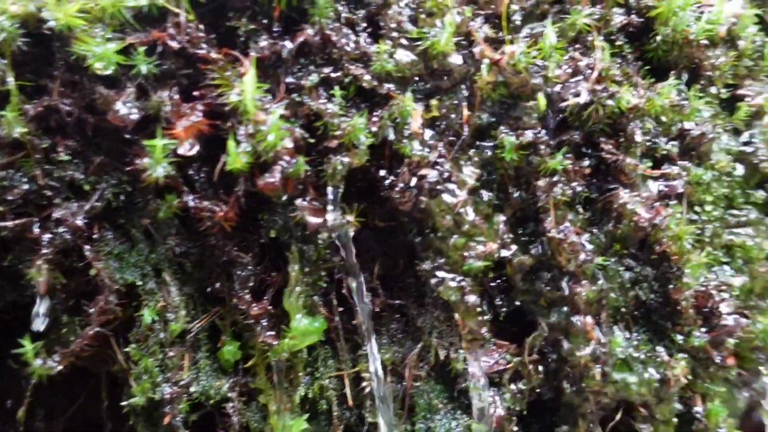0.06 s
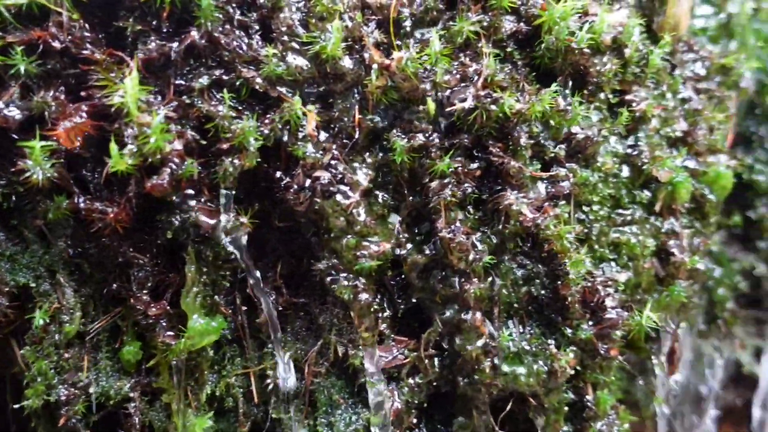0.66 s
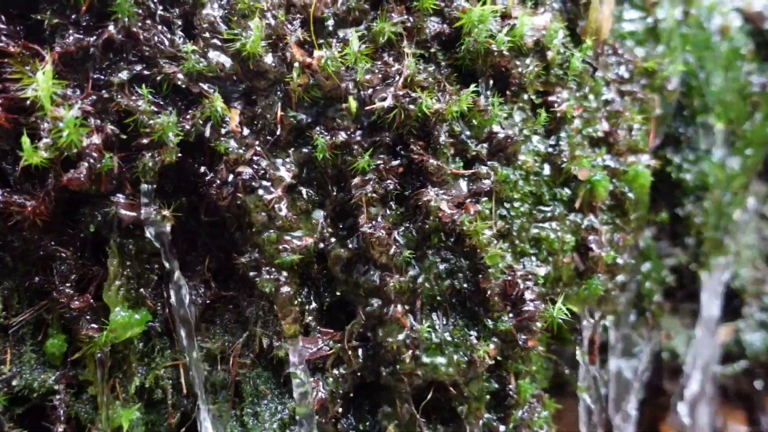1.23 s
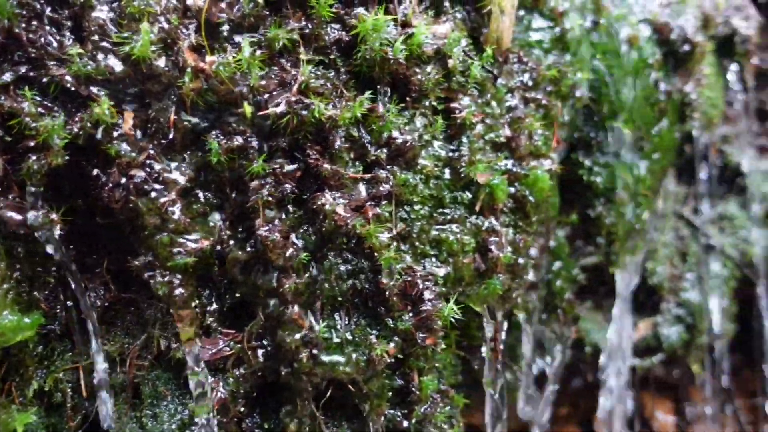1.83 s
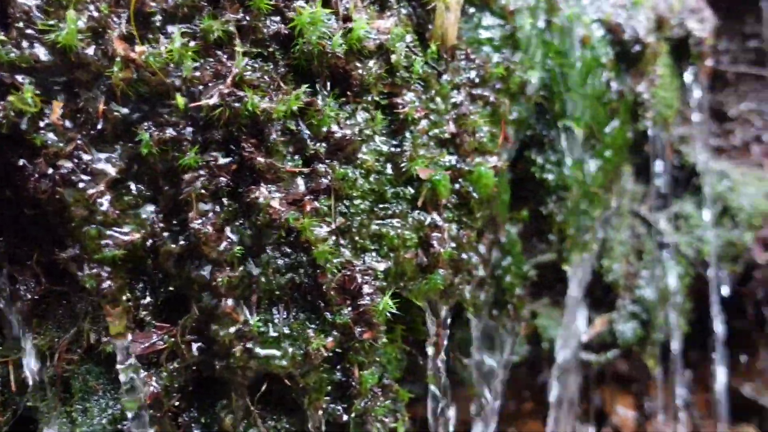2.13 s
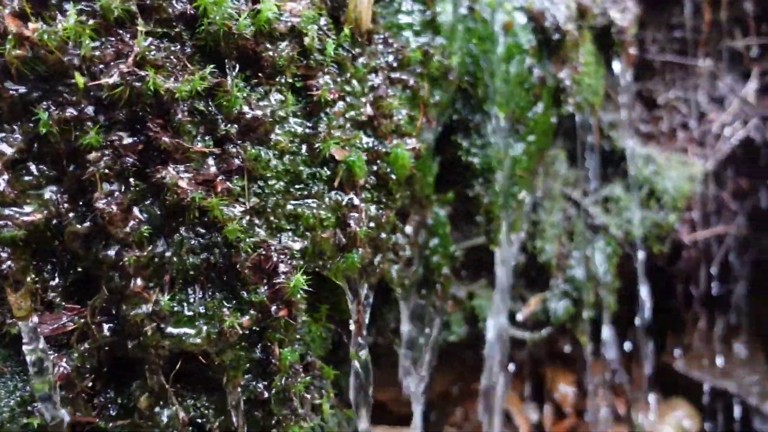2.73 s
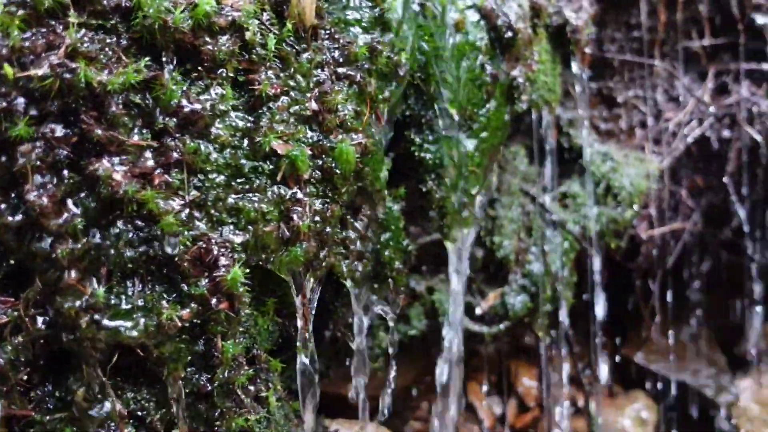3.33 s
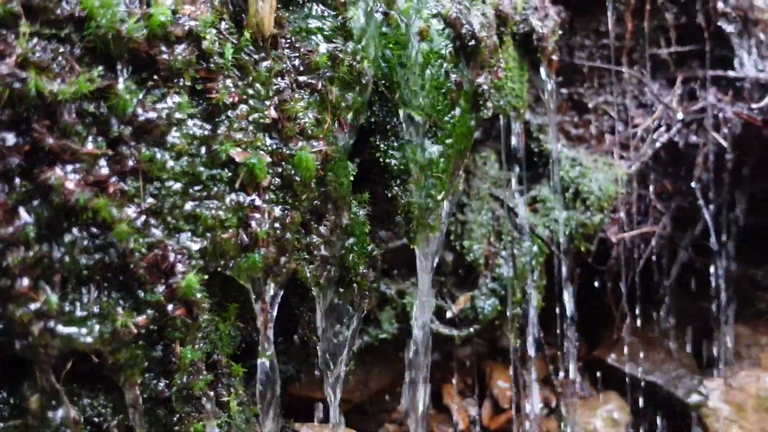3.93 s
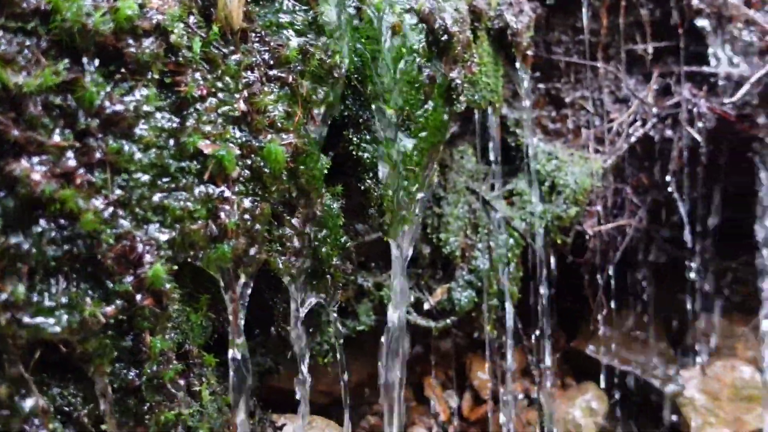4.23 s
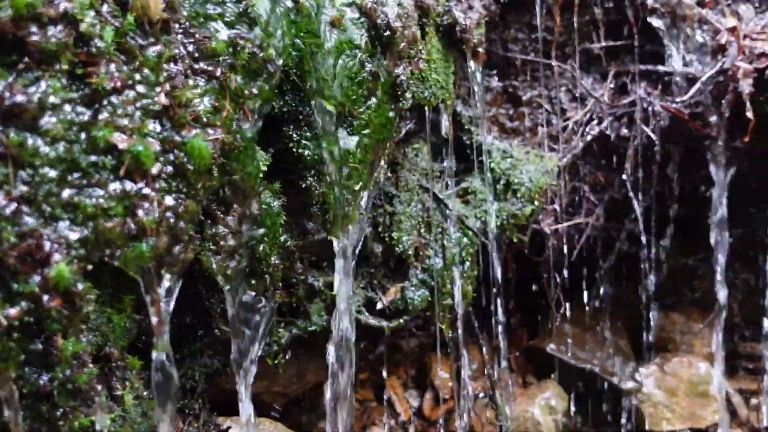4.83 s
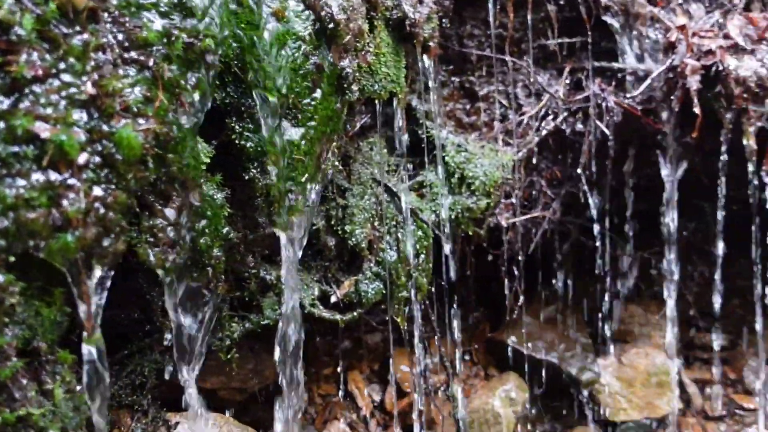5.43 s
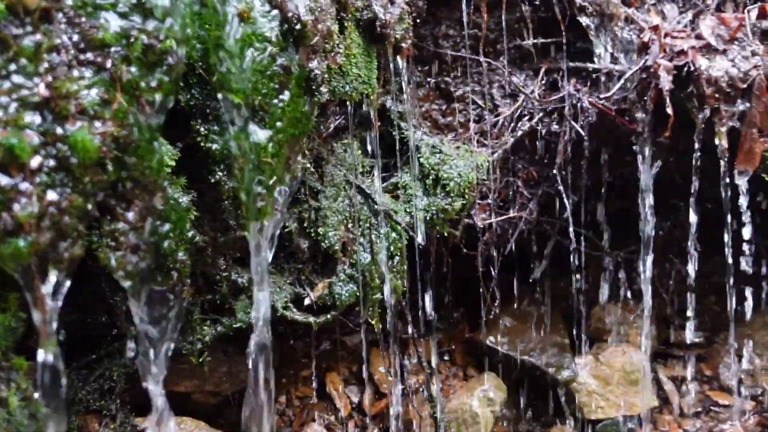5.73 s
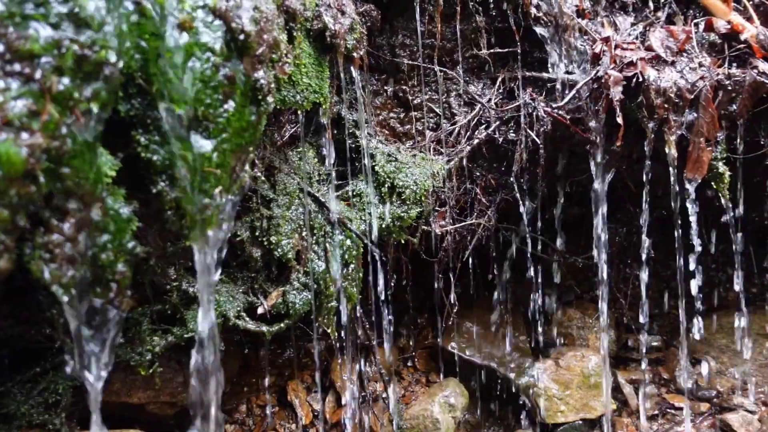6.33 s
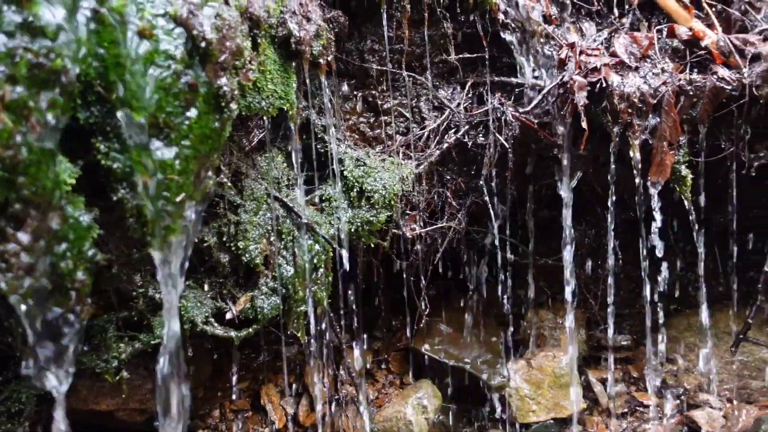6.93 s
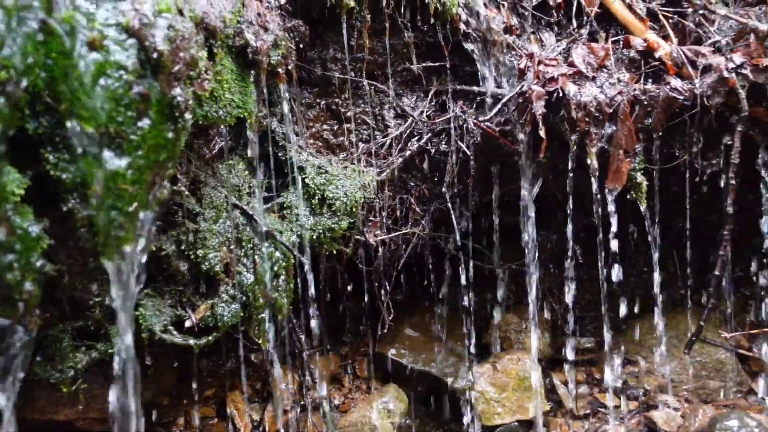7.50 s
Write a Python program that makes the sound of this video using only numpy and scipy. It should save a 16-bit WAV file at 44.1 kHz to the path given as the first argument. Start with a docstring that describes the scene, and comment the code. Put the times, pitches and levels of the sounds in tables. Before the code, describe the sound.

Thin streams of water fall off a mossy overhang and splash onto wet rock and shallow puddles close by. Quick bubbly plips, crisp splats and a light gurgle run throughout, over a fine hiss of spray and the soft wash of farther streams. The hollow under the ledge colours the splashing slightly. As the microphone slowly turns, the water moves from a little right towards the centre and gets slightly brighter.

```python
"""From the start, thin streams fall off a mossy overhang onto wet rock and shallow puddles close by.
Each splash rings short-lived air bubbles and throws fine spray, coloured and scattered by the hollow
under the ledge; farther streams merge into a wash. An air pocket bloops shut just after 1 s and again
at 4.5 s, and three heavy drops thud faintly between about 4.5 and 5.5 s. By the end the microphone
has slowly turned towards the water, which is now a little brighter and nearer the centre."""
import sys
import numpy as np
from scipy import signal
from scipy.fft import rfft, irfft, next_fast_len
from scipy.io import wavfile
from scipy.ndimage import uniform_filter1d, map_coordinates

SR = 44100
rng = np.random.default_rng(int(sys.argv[2]) if len(sys.argv) > 2 else 0)


def unload_wav(signal):
    """Save mono or channel-first audio to the path in sys.argv[1] as 16-bit WAV at rate SR, clipped to [-1, 1]."""
    wavfile.write(
        sys.argv[1],
        SR,
        np.round(np.clip(np.atleast_2d(signal).T, -1, 1) * 32767).astype(np.int16),
    )


N = 333396

# The loudest bubbles in the nearest puddles. Each row: start in seconds, pitch in Hz, level in dB,
# decay in seconds.
LOUD_PLIPS = [(.026, 700, -25, 0.003), (.055, 3060, -8.5, 0.0016), (.228, 1310, -11.5, .0048),
              (.248, 1950, -12, .0028), (.283, 3570, -9, .0022), (.367, 1180, -9.5, 0.0011),
              (.382, 690, -17, .0023), (.391, 2740, -8.5, 0.0019), (.463, 1870, -11.5, .0018),
              (.501, 875, -18, 0.0054), (.586, 1000, -18, .0021), (.622, 890, -15, .0036),
              (.643, 507, -25, 0.0056), (.673, 5060, -8.5, .001), (.814, 500, -22, .0035),
              (.954, 2970, -12, .0014), (.981, 910, -12.5, .003), (1.031, 860, -22, 0.0046),
              (1.077, 4356, -12, .0015), (1.146, 1060, -12, 0.0012), (1.1513, 1270, -11, 0.0026),
              (1.188, 2600, -14, .002), (1.261, 2670, -15, .0015), (1.264, 4100, -9.5, .002),
              (1.316, 3755, -10, .001), (1.387, 2700, -12, .002), (1.397, 643, -22, .0034),
              (1.409, 3150, -7, .0012), (1.439, 1590, -17, .002), (1.476, 680, -22, 0.0029),
              (1.51, 2630, -11, .0027), (1.586, 1480, -10.5, .0034), (1.604, 1500, -13, 0.0022),
              (1.632, 1850, -13, .0023), (1.634, 932, -19, .0035), (1.66, 870, -20, 0.0042),
              (1.716, 2260, -15, .0021), (1.75, 3560, -8.5, .0013), (1.829, 3040, -9, 0.0022),
              (1.854, 3120, -5, .0014), (1.868, 2015, -16, .002), (1.944, 2075, -15.5, .0035),
              (1.989, 1720, -12.5, .004), (1.991, 4490, -9, .0009), (2.007, 1520, -11, 0.002),
              (2.023, 1870, -9, 0.0011), (2.127, 790, -23, 0.0069), (2.138, 3790, -5, .0009),
              (2.267, 745, -19, 0.0035), (2.316, 2554, -12, .0018), (2.327, 2150, -6.5, .0015),
              (2.343, 500, -23, .004), (2.348, 1630, -11, .0018), (2.35, 860, -19, 0.0041),
              (2.37, 860, -20, 0.0057), (2.451, 2670, -7.5, 0.0019), (2.459, 1737, -10, .0012),
              (2.57, 2540, -6.5, .002), (2.585, 736, -15.5, 0.0099), (2.598, 2480, -13, .0016),
              (2.62, 5360, -12, .0013), (2.681, 970, -15, .0028), (2.706, 6600, -11, .0011),
              (2.77, 880, -18.5, .0037), (2.814, 3350, -11.5, .0014), (2.838, 2600, -16, 0.0018),
              (2.857, 2760, -6, .001), (2.884, 1670, -11.5, 0.0024), (2.961, 3740, -10.5, .0014),
              (2.992, 3420, -11.5, 0.0025), (3.026, 4120, -5.5, 0.00073), (3.07, 714, -23, .0035),
              (3.081, 4070, -8, .001), (3.106, 960, -15, .003), (3.134, 940, -17.5, 0.0044),
              (3.171, 940, -14.5, .0025), (3.221, 625, -23, .004), (3.314, 2550, -8.5, 0.0013),
              (3.334, 1737, -15, .0016), (3.352, 5200, -13, .0014), (3.394, 1217, -18, .0022),
              (3.41, 1460, -13, .0022), (3.428, 2620, -12, .002), (3.519, 3620, -10, .0009),
              (3.533, 5650, -15, .0018), (3.556, 3200, -9, 0.0012), (3.633, 1780, -12.5, .0022),
              (3.685, 960, -16, 0.0047), (3.686, 4960, -9, .0011), (3.724, 1217, -14.5, .0037),
              (3.755, 693, -23.5, .0034), (3.765, 4150, -10.5, .0021), (3.782, 1500, -14, .0024),
              (3.806, 1560, -13, .0024), (3.819, 2160, -9.5, 0.0016), (3.828, 4410, -10, .001),
              (3.892, 2410, -11.5, .004), (3.899, 1570, -15.5, 0.0079), (3.906, 2670, -11, .002),
              (3.91, 663, -22, 0.0036), (3.933, 2480, -11, .002), (3.949, 4490, -11, .0012),
              (3.96, 7000, -14, .0011), (3.994, 3140, -7.5, 0.0017), (4.045, 1520, -14, .0025),
              (4.058, 3870, -15, .0012), (4.079, 4140, -9, .001), (4.09, 1050, -13.5, 0.0065),
              (4.123, 4420, -10, .001), (4.161, 920, -19, 0.0036), (4.176, 4380, -9.5, .0015),
              (4.178, 1500, -16, .002), (4.212, 950, -17.5, 0.0061), (4.324, 2710, -13, .0013),
              (4.395, 770, -18, .003), (4.456, 970, -16, .0025), (4.486, 2710, -12, .0016),
              (4.5, 1500, -15, .0019), (4.505, 4620, -12, .0017), (4.616, 795, -19, 0.003),
              (4.636, 854, -21, .003), (4.655, 1940, -12.5, .0018), (4.706, 2030, -14, .0022),
              (4.74, 5000, -10, .001), (4.803, 1270, -16, .0045), (4.823, 700, -16, 0.0031),
              (4.897, 804, -24, .005), (4.9, 1254, -13, .002), (4.942, 960, -17, .0035),
              (4.951, 3700, -8, 0.0015), (4.993, 2790, -12, .0014), (5.065, 4800, -14, .0013),
              (5.113, 2150, -12, .002), (5.121, 1330, -11.5, 0.0034), (5.211, 1480, -8.5, .00095),
              (5.232, 1580, -4, 0.0015), (5.232, 730, -21, .004), (5.262, 2554, -16, .002),
              (5.285, 1950, -8, .0015), (5.292, 4680, -10, .0009), (5.32, 2230, -15, 0.0019),
              (5.387, 1843, -11, .0015), (5.399, 2337, -12, .0021), (5.435, 2340, -9, .001),
              (5.45, 1760, -15, 0.0023), (5.467, 855, -22, 0.01), (5.476, 3320, -12.5, .002),
              (5.496, 1540, -13, 0.0035), (5.496, 3200, -13, .002), (5.555, 2680, -9, .0014),
              (5.742, 1590, -14, .003), (5.789, 4780, -13, .0014), (5.815, 2770, -10.5, .0015),
              (5.829, 1843, -12, .002), (5.835, 2750, -15, .003), (5.877, 5690, -12, .0009),
              (5.891, 700, -23, 0.0036), (5.915, 3050, -11, .0015), (5.925, 1290, -20, .003),
              (5.972, 828, -19.5, .003), (5.975, 2500, -13, .002), (5.997, 4050, -13, .0014),
              (6.006, 2270, -12, .002), (6.092, 1490, -7.5, 0.00084), (6.103, 1590, -12, .0018),
              (6.107, 910, -23, 0.0024), (6.237, 1720, -12, .0022), (6.293, 1680, -13, .0022),
              (6.368, 4356, -14, .0018), (6.373, 1290, -18, 0.0026), (6.387, 1254, -19, .002),
              (6.409, 940, -11.5, .003), (6.428, 804, -17, .0037), (6.477, 3500, -13, .0018),
              (6.487, 2050, -13, .0055), (6.626, 2554, -17, .0018), (6.628, 4730, -13, .0013),
              (6.647, 4450, -13, .0011), (6.692, 3450, -7.5, .0013), (6.697, 1980, -16, .0022),
              (6.698, 878, -17, .0033), (6.726, 1843, -17, .0025), (6.747, 3170, -14, .0018),
              (6.808, 6800, -15, .0014), (6.82, 1570, -11.5, 0.0057), (6.851, 5000, -12, 0.0013),
              (6.874, 3870, -13, .0009), (6.893, 905, -19, .003), (6.915, 3050, -14, 0.0025),
              (6.943, 2650, -12, 0.0035), (6.945, 640, -22, .0035), (6.955, 510, -25, .004),
              (6.984, 970, -8, 0.0021), (7.008, 2690, -10.5, .0032), (7.024, 3240, -14, .003),
              (7.025, 1630, -14, 0.002), (7.077, 615, -23, 0.0026), (7.09, 3985, -11.5, .002),
              (7.1, 1620, -8.5, 0.0018), (7.101, 660, -24, .0035), (7.116, 2350, -7, .0012),
              (7.125, 1290, -14, .0024), (7.215, 2450, -11, .002), (7.216, 1700, -15, .0025),
              (7.224, 6560, -10, .001), (7.273, 4750, -12, .0014), (7.289, 4900, -11, .0013),
              (7.323, 6035, -15, .0016), (7.324, 3755, -12, .0013), (7.34, 1500, -9.5, .003),
              (7.455, 1550, -8.5, 0.0016), (7.466, 853, -20.5, 0.004), (7.476, 1750, -13, .0024),
              (7.515, 1630, -15, .003), (7.517, 2390, -10, .0014), (7.545, 1540, -9, 0.0024)]
# The lesser plips, biggest bubble first. Each row: pitch in Hz, top level in dB.
LESSER_PLIPS = [(780, -20), (1400, -19), (2300, -21.5), (3200, -17.5), (4600, -17), (6800, -23)]
# Air pockets pinching shut. Each row: centre in seconds, pitch there in Hz, level in dB,
# swell in seconds, glide in octaves a second.
AIR_POCKETS = [(1.149, 1006, -18.5, .0065, 38), (4.524, 992, -14.5, .0042, 18)]
# Blobs bursting on rock. Each row: centre in seconds, pitch in Hz, top level in dB, length in seconds.
ROCK_SPLATS = [(.084, 3500, -12, 0.027), (.552, 3100, -10.5, 0.02), (.795, 4200, -12, 0.023),
               (1.53, 4270, -8, 0.024), (1.676, 3180, -10.5, 0.018), (2.078, 3080, -13.5, 0.015),
               (2.233, 4060, -9.5, 0.017), (2.335, 2250, -21, 0.02), (2.622, 4400, -13, 0.03),
               (3.004, 5000, -12, .01), (3.2, 2800, -13, 0.034), (3.322, 2660, -16, 0.032),
               (4.325, 3570, -15, 0.032), (4.455, 2700, -15, .028), (4.74, 4200, -14, 0.038),
               (5.027, 2620, -14, 0.032), (5.205, 3450, -17, 0.019), (5.268, 3050, -18, 0.026),
               (5.319, 3400, -13, 0.013), (5.624, 2900, -17, .03), (6.185, 5000, -11, .03),
               (6.813, 2700, -13, 0.033), (6.942, 2200, -18, .02), (7.216, 2540, -18, 0.027),
               (7.549, 4100, -8.5, 0.025)]
# The hardest drops on bare stone. Each row: start in seconds, level in dB.
HARD_SMACKS = [(.7955, -10), (1.0799, -5), (1.102, -2), (1.3166, -11), (1.5385, -7), (1.609, -8),
               (2.4783, 1), (2.5648, -7), (2.8485, -10), (3.266, -4), (3.4802, -6), (3.5197, -4),
               (4.235, -6), (4.4355, -9), (4.6222, -11), (4.9976, -3), (5.1835, -8), (5.274, -6),
               (5.9107, -13), (6.3083, -8), (6.3425, -7), (6.5492, -6), (6.7792, -13), (7.1696, -12)]
# Heavy drops on soft ground. Each row: start in seconds, level in dB.
GROUND_THUDS = [(4.472, -63), (5.229, -64), (5.505, -68)]
# The flow of the thick stream into its pool. Each row: time in seconds, level in dB.
PLUNGE_FLOW = [(0, -35.5), (1.4, -34.5), (2.2, -34.5), (3.2, -34.5), (4.1, -37), (4.7, -33), (5.3, -34),
               (5.8, -38), (6.5, -37), (7.56, -35.5)]
# Air resonances under the ledge. Each row: centre in Hz, width in Hz, boost or cut in dB.
HOLLOW_RESONANCES = [(532, 136, 4), (634, 49, -1), (724, 51, 2.5), (769, 50, -2.5), (926, 110, 5),
                     (1093, 210, -6), (1418, 32, -11.5), (1657, 68, -4.5)]

# The tone of each layer. Each row: frequency in Hz, relative level in dB.
WATER_EQ = [(71, -94), (120, -55), (312, -26), (519, -11.5), (636, -13), (719, -9.5), (936, -9),
            (1100, 0.5), (1560, -0.5), (4220, -1), (9910, -7.5), (13400, -15.5), (15500, -43)]  # the splashing as a whole
PUDDLE_EQ = [(200, -1.5), (800, 0.5), (1400, -2), (4000, -2.5), (7000, -3.5), (15000, -1)]  # shallow puddles, on top of WATER_EQ
POOL_EQ = [(150, -55), (400, -12.5), (650, -4.5), (925, -0.5), (1300, -7.5), (2200, -5), (6000, -46)]  # the plunge pool, on top of WATER_EQ
WASH_EQ = [(150, -0.5), (500, 1), (930, 2.5), (1500, 3.5), (4000, 0.5), (8000, 0), (14000, -4.5)]  # far streams, on top of WATER_EQ
SMACK_EQ = [(100, -58), (400, -20), (1200, -5), (3000, -2), (5500, 10.5), (8500, -7), (11000, -9),
            (13500, -7), (15500, -11)]  # drops cracking on stone
SPRAY_EQ = [(100, -67), (400, -35), (1200, -25), (3000, 4), (5000, -2), (8000, -2.5), (11000, -5),
            (15500, -20)]  # ticking droplets
MIST_EQ = [(100, -80), (1500, -29), (4000, 10), (7000, -0.5), (10000, -2), (13000, 0.5), (15500, -8)]  # the finest spray
SHEEN_EQ = [(2000, -56), (7000, 3.5), (11000, 0.5), (13500, 0), (15500, -2.5)]  # far spray on moss and leaves
FOREST_EQ = [(20, -2), (70, -7), (160, 3), (400, -12), (2000, -50)]  # still forest air

# Moss screens the water until the microphone has turned. Each row: time in seconds, treble gain in dB.
MOSS_SCREEN = [(0, -3), (1.2, -1.6), (1.8, -1.2), (2.5, -0.5), (4, 0), (5.6, 1.4), (6.5, 1), (7.56, 0.2)]
# Low sound bends round the moss. Each row: frequency in Hz, share of the screening that applies.
SCREEN_SHARE = [(400, 0), (900, 0.59), (2000, 0.39), (5000, 0.62), (13000, 0.89)]
# Where the water lies. Each row: time in seconds, left over right in dB.
WATER_PAN = [(0.0, -5), (1.22, -3.5), (7.56, -1.0)]
# The microphone's sense of direction. Each row: frequency in Hz, share of the pan it picks up.
PAN_SHARE = [(200, 0.4), (700, 0.16), (1300, 0.92), (4400, 1), (8000, 1.04), (13000, -0.29)]
# Diffuse sound at its two ports. Each row: frequency in Hz, left-right correlation.
PORT_LIKENESS = [(60, .85), (140, 0.73), (300, 0.75), (640, 0.96), (1400, 0.96), (3100, 0.96), (7000, 0.79),
                 (10000, 0.74), (13000, 1)]
# The phase between the ports. Each row: frequency in Hz, lead of the left in radians.
PORT_PHASE = [(20, 0), (5600, 0.2), (9700, 0.82), (12700, 0.5), (15300, 0)]

PUDDLE_DB, SPRAY_DB, WASH_DB, SHEEN_DB, FOREST_DB = -27, -27.5, -24, -35.5, -85  # faders of the beds
BAND_LIMIT_HZ = 15700


def near_bubbles(count=330, big_decay_s=0.0042, small_bias=0.633, spread_db=2):
    """The loudest plips over a drip of lesser ones; small bubbles ring higher and die sooner."""
    when, pitch, weakness, ring = rng.random((count, 4)).T
    low_hz, high_hz = LESSER_PLIPS[0][0], LESSER_PLIPS[-1][0]
    hz = low_hz * (high_hz / low_hz) ** (pitch ** small_bias)  # a bias under 1 favours high pitches
    decay_s = big_decay_s * (hz / low_hz) ** -0.57 * 2 ** (ring - .5)
    db = along(LESSER_PLIPS, hz) - spread_db * weakness
    return plips(*np.transpose(LOUD_PLIPS)) + plips(drip_times(when), hz, db, decay_s)


def plips(start, hz, db, decay_s, samples=2200, shudder=.58, splash_db=-8.5, splash_decay_s=0.0037):
    """Each blob rings a bubble that shudders as the water breaks, with a splash and two fainter bubbles."""
    pan_db = rng.normal(0, 0.88, len(start))
    jolts = uniform_filter1d(rng.standard_normal((len(start), samples)), size=12, axis=1)
    stray = shudder * np.cumsum(jolts, axis=1) / np.sqrt(decay_s * SR)[:, None]
    ring = bubble_ring(hz, decay_s, rise=0.025, swell=0.38, samples=samples, stray=stray)
    rings = placed(start, amp(db - 2.0)[:, None] * ring, pan_db)
    for delay, ratio in rng.random((2, 2, len(start))):
        wake_hz = np.minimum(hz * (0.87 + 0.73 * ratio), 9000)
        wake = bubble_ring(wake_hz, 0.41 * decay_s, rise=0.04, swell=0.33, samples=1100)
        rings += placed(start + 0.000996 + 0.0045 * delay, amp(db - 9.5)[:, None] * wake, pan_db)
    t = np.arange(SR // 40) / SR
    bursts = rng.standard_normal((len(start), len(t))) * np.exp(-t / splash_decay_s)
    splashes = placed(start, amp(db + splash_db)[:, None] * bursts, pan_db)
    splashes = coloured(splashes, lambda f: hollow_water_db(f) + along(PUDDLE_EQ, f))
    return coloured(rings, lambda f: low_cut_db(f, corner_hz=685)) + splashes


def bubble_ring(hz, decay_s, rise, swell, samples, stray=0):
    """One row per bubble: it swells, dies away and rises in pitch as it nears the surface."""
    t = np.arange(samples) / SR
    age = t / decay_s[:, None]
    envelope = np.exp(-age) * (1 - np.exp(-age / swell))
    phase = 2 * np.pi * hz[:, None] * t * (1 + rise * np.minimum(age, 10) / 2)
    return envelope / envelope.max(1, keepdims=True) * np.sin(phase + stray)


def splats(droplets=17, spread_db=8.5, spread_octaves=1.19):
    """A blob bursts on the rock and its droplets land in a quick, crisp cluster."""
    centre, pitch, db, length = np.repeat(ROCK_SPLATS, droplets, axis=0).T
    when, smallness, weakness, side = rng.random((len(centre), 4)).T
    hz = pitch * 2 ** (spread_octaves * (smallness - .5))
    gain = amp(db - spread_db * weakness)
    ticks = gain[:, None] * bubble_ring(hz, 1.74 / hz, rise=0.02, swell=0.17, samples=360)
    clusters = placed(centre + length * (when - .5), ticks, pan_db=6 * (side - .5))
    return coloured(clusters, lambda f: low_cut_db(f, corner_hz=990))


def smacks(count=180, light_db=-18, spread_db=7, decay_s=0.0004):
    """Hard drops crack on bare stone; lighter ones fall at random between them."""
    when, weakness = rng.random((count, 2)).T
    light_smacks = np.column_stack([drip_times(when), light_db - spread_db * weakness])
    start, db = np.vstack([HARD_SMACKS, light_smacks]).T
    t = np.arange(SR // 200) / SR
    cracks = rng.standard_normal((len(start), len(t))) * np.exp(-t / decay_s)
    cracks *= (amp(db) / np.abs(cracks).max(1))[:, None]
    return coloured(placed(start, cracks, rng.normal(0, 1, len(start))), lambda f: along(SMACK_EQ, f))


def bloops():
    """A shrinking air pocket swells in level and glides up in pitch, shuddering as it closes."""
    centre, hz, db, swell_s, glide = np.transpose(AIR_POCKETS)[:, :, None]
    t = np.arange(-SR // 25, SR // 25) / SR
    gliding_hz = hz * 2 ** (glide * np.minimum(t, swell_s))
    phase = 2 * np.pi * np.cumsum(gliding_hz, axis=1) / SR
    envelope = 1 / np.cosh(t / np.where(t < 0, swell_s, .7 * swell_s))
    shudder = wobble(354)[:len(t)]
    tones = amp(db + 2.5 * np.tanh(shudder)) * np.sin(phase + .5 * shudder) * envelope
    pockets = placed(centre[:, 0] + t[0], tones, np.zeros(len(centre)))
    return coloured(pockets, lambda f: low_cut_db(f, corner_hz=520))


def gurgle(blobs=1500, cluster=3):
    """Thin streams break into blobs; each traps a cluster of like-sized bubbles in the puddles."""
    when, pitch, weakness = rng.random((blobs, 3)).repeat(cluster, axis=0).T
    lag, detune, ring = rng.standard_normal((blobs * cluster, 3)).T
    start = when * N / SR + .004 * np.abs(lag)
    hz = (33 + 57 * pitch) ** 2 * np.exp(0.278 * np.tanh(detune))  # pitches crowd towards the low end
    decay_s = np.clip(.0014 * (hz / 2000) ** -.55 * np.exp(.4 * ring), .0004, .004)
    gain = amp(-8 * weakness) * hz ** .25 / np.sqrt(decay_s)
    rings = gain[:, None] * bubble_ring(hz, decay_s, rise=0.0076, swell=0.15, samples=700)
    puddles = placed(start, rings, pan_db=rng.normal(0, 5.3, len(start)))
    return unit(coloured(puddles, lambda f: hollow_water_db(f) + along(PUDDLE_EQ, f)))


def spray(count=12000, mist_db=-5.0):
    """Droplets tick on the stone in flurries; the finest merge into a hissing mist."""
    when, pitch, weakness, side = rng.random((count, 4)).T
    hz = 2000 + 11000 * pitch
    gain = amp(-18 * weakness ** .6) * np.sqrt(hz)
    ticks = gain[:, None] * bubble_ring(hz, 1.5 / hz, rise=0, swell=0.21, samples=140)
    patter = placed(when * N / SR, ticks, pan_db=15 * (side - .5))
    patter = unit(coloured(patter, lambda f: along(SPRAY_EQ, f)))
    mist = unit(noise_bed(MIST_EQ))
    flurry_db = 4.6 * np.tanh(wobble(220)) + 3.7 * np.tanh(wobble(85))
    return unit((patter + amp(mist_db) * mist) * amp(flurry_db))


def plunge(count=1500, centre_hz=925):
    """The thick stream drives big bubbles into a pool; they glug in the hollow."""
    when, pitch, ring, weakness = rng.random((count, 4)).T
    detune = np.clip(0.096 * np.tan(2.54 * (pitch - .5)), -.3, .3)  # most bubbles are near one size
    hz = centre_hz * np.exp(detune)
    decay_s = (1.66 + 1.8 * ring) / hz
    glugs = amp(-10 * weakness)[:, None] * bubble_ring(hz, decay_s, rise=0.018, swell=0.42, samples=1400)
    pool = placed(when * N / SR, glugs, pan_db=rng.normal(0, 1, count))
    return unit(coloured(pool, lambda f: hollow_water_db(f) + along(POOL_EQ, f)))


def wash(patchy_db=2.5):
    """Farther streams blur into a seething noise with patches of random strength."""
    spectrum = signal.stft(rng.standard_normal((2, N)), nperseg=256)[2]
    patches = uniform_filter1d(rng.standard_normal(spectrum.shape[1:]), size=9, axis=0)
    patches = uniform_filter1d(patches, size=6, axis=1)
    seethe = signal.istft(spectrum * amp(patchy_db * unit(patches)), nperseg=256)[1][:, :N]
    return unit(diffuse(filtered(seethe, lambda f: amp(hollow_water_db(f) + along(WASH_EQ, f)))))


def sheen():
    """Far spray keeps up an even, finely sizzling hiss."""
    return unit(noise_bed(SHEEN_EQ) * amp(2.2 * wobble(450)))


def thuds(hz=60, decay_s=.008):
    """Each heavy drop gives the ground one short, dull push."""
    start, db = np.transpose(GROUND_THUDS)
    t = np.arange(SR // 10) / SR
    push = np.sin(2 * np.pi * hz * t) * np.exp(-t / decay_s)
    return placed(start, amp(db)[:, None] * push, np.zeros(len(start)))


def forest():
    """The faint, wavering low hush of forest air."""
    return amp(FOREST_DB + 5.6 * np.tanh(wobble(14))) * unit(noise_bed(FOREST_EQ))


def rock_echoes(x, wet_db, t60_s, spots=3):
    """Wet rock adds a short scatter of echoes, different for each spot where water lands."""
    t = np.arange(SR // 16) / SR
    sends = np.array([wobble(14) for _ in range(spots)])
    sends /= np.linalg.norm(sends, axis=0)
    echoes = np.zeros((2, N))
    for send in sends:
        tail = rng.standard_normal((2, len(t))) * amp(-60 * t / t60_s) * (1 - np.exp(-t / 0.002))
        tail /= np.linalg.norm(tail[0])
        echoes += signal.oaconvolve((x.mean(0) * send)[None], tail, axes=1)[:, :N]
    return x + amp(wet_db) * diffuse(echoes)


def microphone_turn(water):
    """As the microphone turns, the moss screens less treble and the water drifts in from the right."""
    screen_gain = amp(automation(MOSS_SCREEN))
    water = water + filtered(water * (screen_gain - 1), lambda f: along(SCREEN_SHARE, f))
    pan_gain = amp(np.array([[1], [-1]]) * automation(WATER_PAN) / 2)
    return water + filtered(water * (pan_gain - 1), lambda f: along(PAN_SHARE, f))


def hollow_water_db(hz):
    """The tone of splashing water, shaped by the air resonating in the hollow."""
    resonances = sum(db / (1 + (2 * (hz - centre) / width) ** 2) for centre, width, db in HOLLOW_RESONANCES)
    return along(WATER_EQ, hz) + resonances


def low_cut_db(hz, corner_hz):
    """Small bubbles move too little air to radiate far below their pitch."""
    return -10 * np.log10(1 + (corner_hz / (hz + 80)) ** 7)


def surge(slow_db, fast_db):
    """The gain of a stream that swells slowly and sputters as it breaks into blobs."""
    return unit(amp(slow_db * np.tanh(wobble(3.9)) + fast_db * np.tanh(wobble(45))))


def drip_times(chance):
    """Seconds of a steady but uneven drip: one drop somewhere in each equal stretch."""
    return (np.arange(len(chance)) + chance) / len(chance) * N / SR


def noise_bed(eq):
    """Diffuse stereo noise with the given tone."""
    return diffuse(filtered(rng.standard_normal((2, N)), lambda f: amp(along(eq, f))))


def diffuse(pair):
    """Two unrelated signals as two close microphone ports hear them."""
    def mid_side_gains(hz):
        angle = np.arccos(np.clip(along(PORT_LIKENESS, hz), -1, 1)) / 2
        return np.array([np.cos(angle), np.sin(angle)])
    mid, side = filtered(pair, mid_side_gains)
    return np.array([mid + side, mid - side])


def placed(times, grains, pan_db):
    """Stereo mix of one grain per row, each at its time and pan."""
    at = np.round(np.abs(times) * SR).astype(int)[:, None] + np.arange(grains.shape[1])
    channels = [grains * amp(side * pan_db / 2)[:, None] for side in (1, -1)]
    return np.array([np.bincount(at.ravel(), channel.ravel(), N)[:N] for channel in channels])


def coloured(x, colour_db):
    """Minimum-phase EQ, so that nothing rings before a splash."""
    size = 2 * next_fast_len(N // 2 + SR // 4)
    cepstrum = irfft(np.log(amp(colour_db(np.fft.rfftfreq(size, 1 / SR)))))
    cepstrum[1:size // 2] *= 2
    cepstrum[size // 2 + 1:] = 0
    return irfft(rfft(x, size) * np.exp(rfft(cepstrum)), size)[..., :N]


def filtered(x, response):
    """x through a frequency response."""
    size = next_fast_len(N + SR // 2)
    return irfft(rfft(x, size) * response(np.fft.rfftfreq(size, 1 / SR)), size)[..., :N]


def wobble(rate):
    """A smooth random curve, rate knots a second."""
    return map_coordinates(rng.standard_normal(int(N * rate / SR) + 4), [np.arange(N) * rate / SR])


def automation(points):
    """(seconds, value) points read at every sample."""
    return np.interp(np.arange(N) / SR, *np.transpose(points))


def along(points, hz):
    """(Hz, value) points read on a log axis."""
    freqs, values = np.transpose(points)
    return np.interp(np.log(hz + 1), np.log(freqs), values)


def amp(db):
    """Decibels to gain."""
    return 10 ** (np.asarray(db) / 20)


def unit(x):
    """x at rms 1."""
    return x / np.sqrt(np.mean(x ** 2) + 1e-20)


def scene():
    """Near splashes and their echoes in front, the wash behind, the ground and forest underneath."""
    streams = (amp(automation(PLUNGE_FLOW)) * surge(slow_db=-0.3, fast_db=2.5) * plunge()
               + amp(PUDDLE_DB) * surge(slow_db=0.0, fast_db=1.5) * gurgle()
               + amp(SPRAY_DB) * surge(slow_db=-0.5, fast_db=1.5) * spray())
    drops = near_bubbles() + bloops() + smacks() + splats()
    near = rock_echoes(drops + streams, wet_db=-8.0, t60_s=0.021)
    water = near + amp(WASH_DB) * wash() + amp(SHEEN_DB) * sheen()
    return microphone_turn(water) + thuds() + forest()


def record(dry):
    """The microphone's ports differ slightly in treble phase; nothing passes above the band limit."""
    half_turns = np.array([[.5j], [-.5j]])  # left leads and right lags, each by half the phase
    return filtered(dry, lambda f: np.exp(half_turns * along(PORT_PHASE, f)) * (f < BAND_LIMIT_HZ))


dry = scene()
out = record(dry)
unload_wav(out)
```